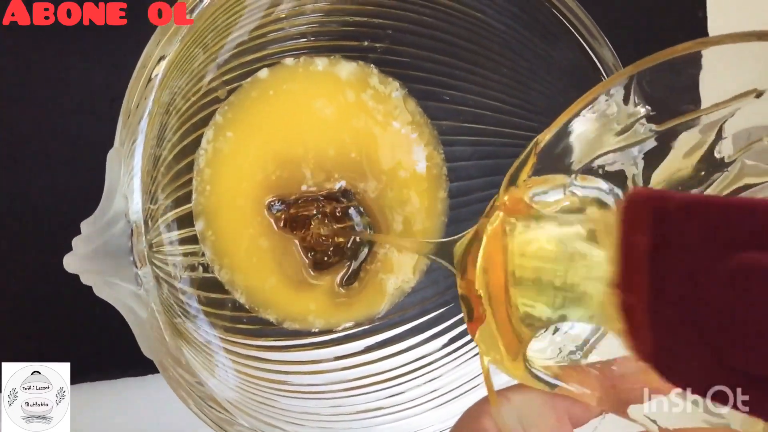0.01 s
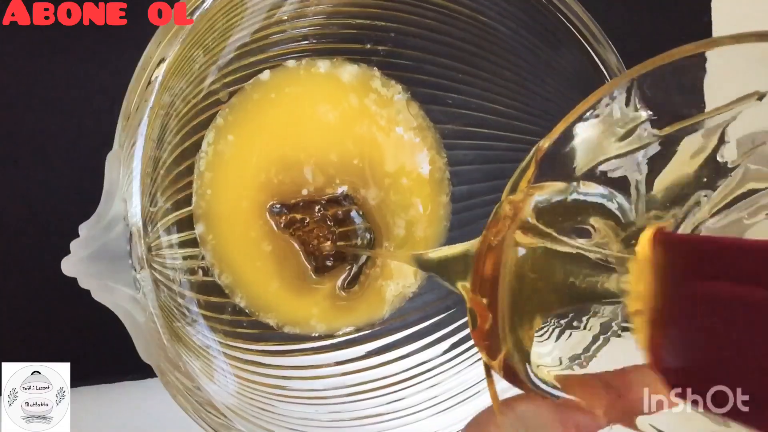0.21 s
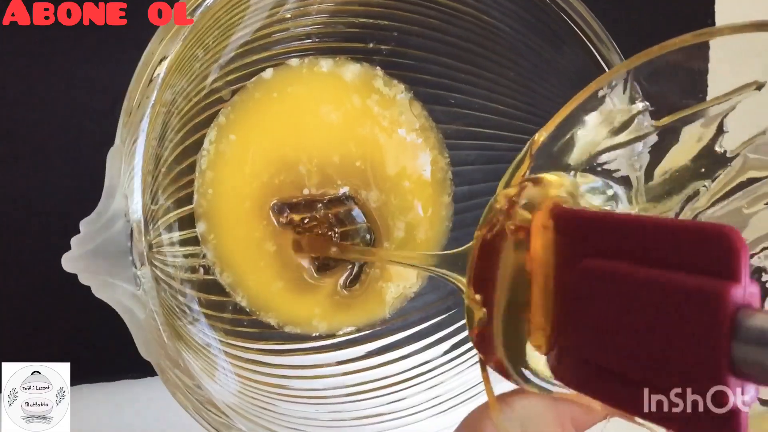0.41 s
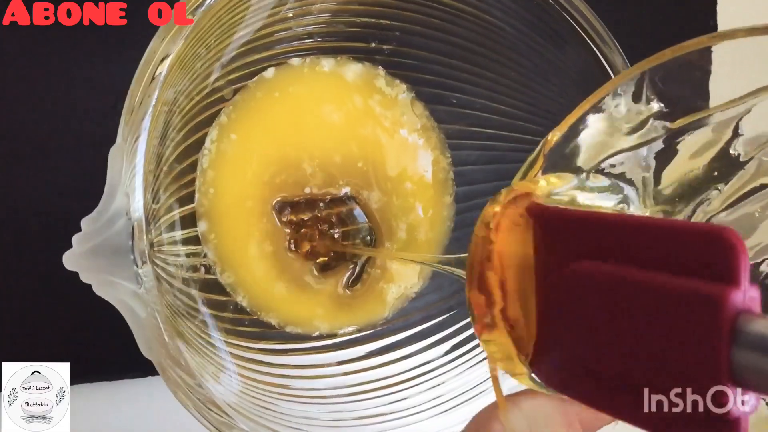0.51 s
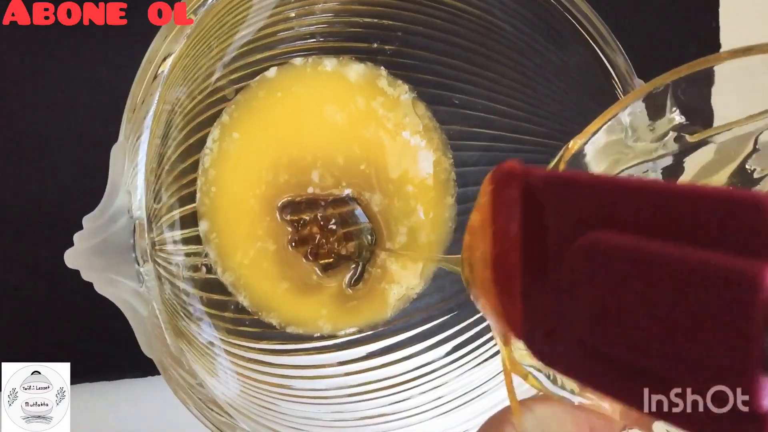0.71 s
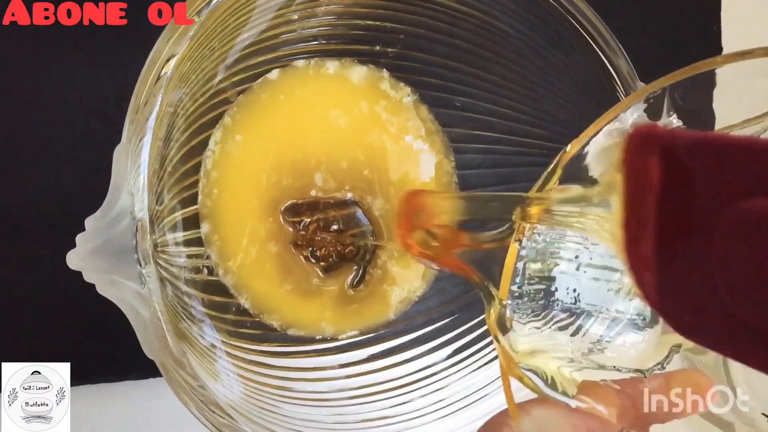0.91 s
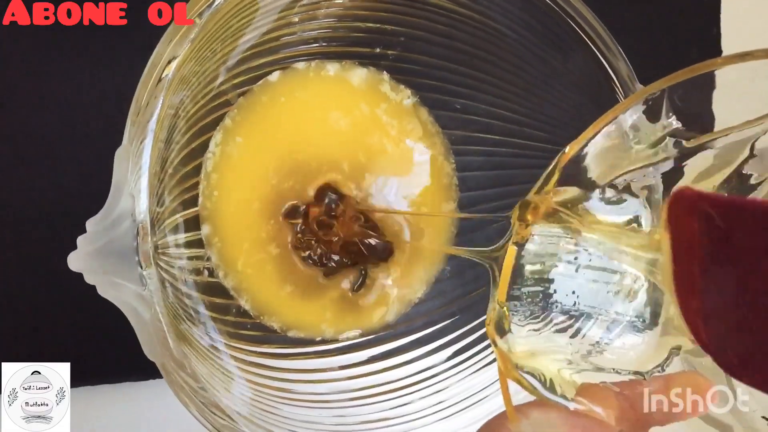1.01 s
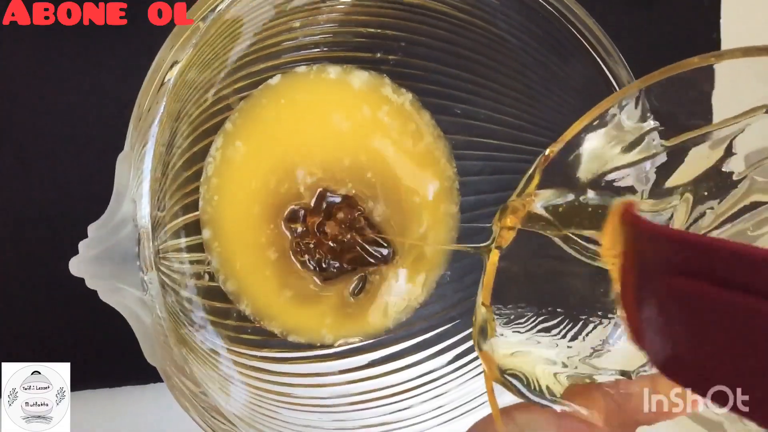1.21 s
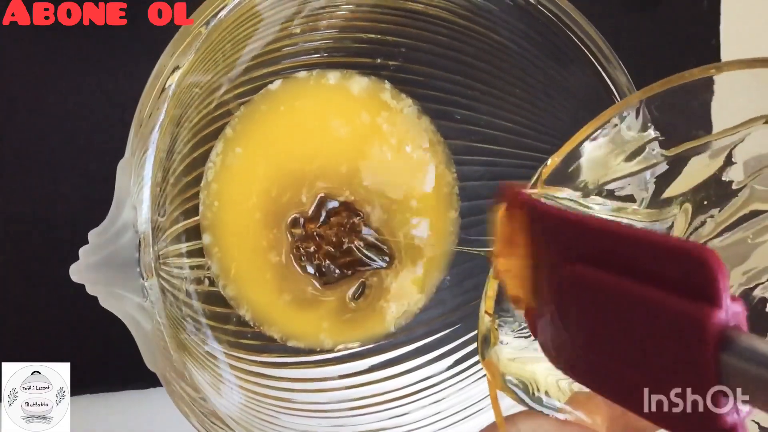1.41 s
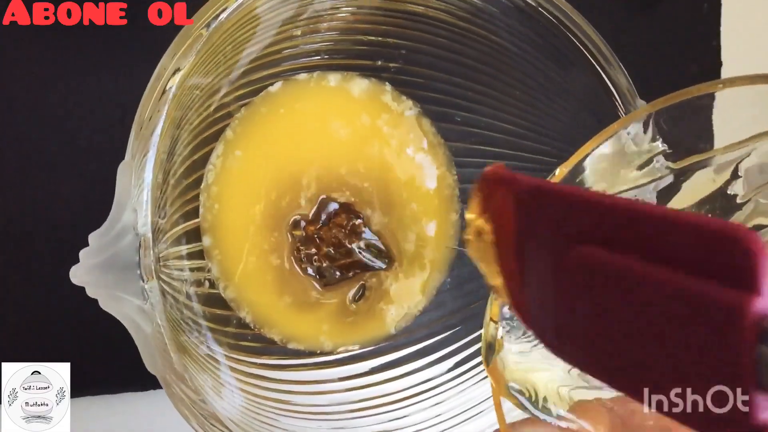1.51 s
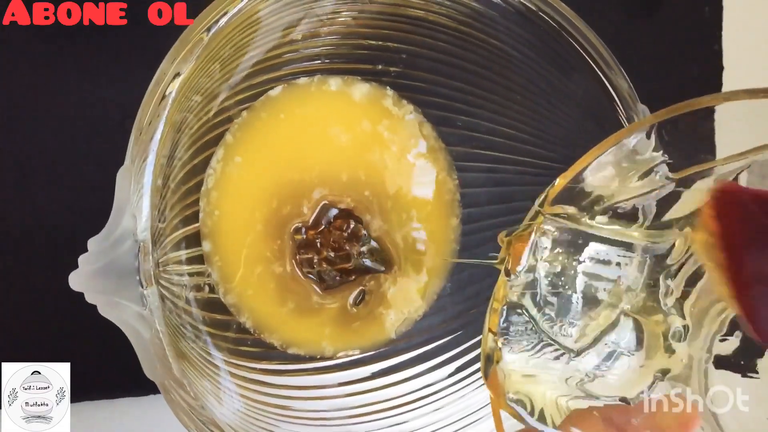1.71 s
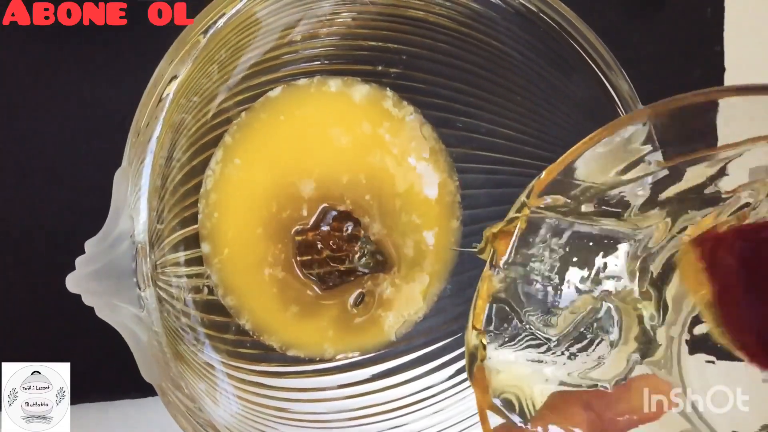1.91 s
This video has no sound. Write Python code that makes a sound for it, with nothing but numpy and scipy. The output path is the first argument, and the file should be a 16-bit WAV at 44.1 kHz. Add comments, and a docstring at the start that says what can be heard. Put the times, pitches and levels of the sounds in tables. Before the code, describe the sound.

A small glass bowl knocks once against a larger one with a sharp, quickly damped clink. A faint dull bump follows, then a sticky spatula snap and a few tiny syrup ticks, close by in a quiet kitchen.

```python
"""A small hand-held glass bowl knocks once against a larger one in a quiet kitchen.
The impact excites the modes of both bowls, and the hand damps their ring. A dull bump follows farther
off, then a sticky snap of the spatula and faint ticks of syrup, each an impulse with a brief fizz.
Knock and ticks reverberate in the room, over a low throbbing shudder, a hush and a faint hum."""
import sys
import numpy as np
from scipy import signal
from scipy.io import wavfile

SR = 44100
rng = np.random.default_rng(int(sys.argv[2]) if len(sys.argv) > 2 else 0)


def transcribe(u):
    """Save the signal u as a 16-bit wav file named by the first command-line argument.

    u: samples, shape (n,) or (channels, n), limited to [-1, 1]; the rate is SR.
    q: integer samples, one column per channel.
    """
    v = np.clip(np.atleast_2d(u).T, -1, 1)
    q = np.round(v * 32767).astype(np.int16)
    wavfile.write(sys.argv[1], SR, q)


N = 88200
TIME_S = np.arange(N) / SR


# Modes of the two bowls: frequency_hz, level_db, t60_s
BOWL_MODES = [(250, -24.5, 0.022), (334, -27.5, .015), (615, -22, 0.045), (865, -32.5, 0.025),
              (966, -25, .26), (1903, -32, .3), (3210, -34, .3), (3300, -37, .35), (7090, -42, .15),
              (11170, -32, .07), (1021.5, -12, 0.053), (1097, -17.5, 0.043), (1390, -11.5, 0.021),
              (1590, -26.5, 0.075), (1867, -14.5, 0.049), (2440, -20, 0.03), (2688, -15, 0.028),
              (2766, -9, 0.0086), (3196, -15, 0.027), (3526, -13, .013), (4530, -22.5, 0.0093),
              (5380, -21.5, .01), (7290, -20, 0.017), (9330, -25.5, 0.0089), (11660, -20, .007),
              (12495, -13, 0.0086), (14800, -20, 0.0082), (15100, -24, 0.0064)]

def bowl_knock(start_s=.2086, contact_s=.001, low_cut_hz=130):
    """Modal vibration: each mode builds up during contact, then decays, over a broadband crack."""
    sound = burst(start_s, level_db=-18, rise_s=contact_s, t60_s=.022, centre_hz=6000, width_hz=14000)
    for frequency_hz, level_db, t60_s in BOWL_MODES:
        mode = np.sin(2 * np.pi * frequency_hz * (TIME_S - start_s))
        sound += amp(level_db) * mode * swell(start_s, contact_s, t60_s)
    return high_pass(sound, low_cut_hz)


# Spatula snap and syrup ticks: start_s, pop_db, fizz_db, centre_hz, width_hz, t60_s
STICKY_SNAPS = [(.312, -61, -53, 15000, 2500, .006), (1.103, -56, -50.5, 11500, 9000, 0.024),
                (1.0935, -27, -35, 8500, 13600, .007), (1.0949, -23, -31, 8500, 13600, .008),
                (1.2219, -32, -50.5, 13260, 5100, 0.0095), (1.2533, -45.5, -45.5, 13000, 5000, 0.0036),
                (1.2531, -33.5, -67, 13800, 5000, 0.013), (1.287, -45, -62, 13500, 4000, .004),
                (1.5905, -38.5, -55, 13830, 5080, 0.0071), (1.9182, -49, -51.5, 14000, 4900, 0.0033)]

def sticky_snaps(rise_s=.0005):
    """Impulse response: each snap is a band-limited pop with a short fizz in the same band."""
    sound = np.zeros(N)
    for start_s, pop_db, fizz_db, centre_hz, width_hz, t60_s in STICKY_SNAPS:
        impulse = np.full(N, 1e-18)
        impulse[int(start_s * SR)] = amp(pop_db)
        sound += band(impulse, centre_hz - width_hz / 2, centre_hz + width_hz / 2)
        sound += burst(start_s - rise_s, fizz_db, rise_s, t60_s, centre_hz, width_hz)
    return sound


# Noise bands of the bumps: start_s, level_db, rise_s, t60_s, centre_hz, width_hz
BUMP_BANDS = [(0.615, -54.5, 0.019, 0.2, 1880, 644), (0.616, -56.5, .012, 0.28, 960, 527),
              (.622, -65, 0.014, 0.17, 2860, 1980), (.6, -56.5, 0.014, 0.12, 251.7, 150),
              (0.691, -61, 0.0084, 0.4, 525, 196), (.8, -65.5, 0.023, .4, 500, 195),
              (1.092, -58, 0.00081, 0.072, 2350, 394), (1.069, -62, 0.017, 0.22, 2340, 4000),
              (1.092, -50.5, 0.0044, 0.23, 219, 156), (1.092, -54, 0.0027, 0.091, 700, 148),
              (1.092, -60, 0.0016, 0.08, 1364, 198)]

def dull_bumps():
    """Transient noise: decaying bands add up to the far bump and a soft thud under the snap."""
    return sum(burst(*row) for row in BUMP_BANDS)


# Hollow tones of the far bump: start_s, level_db, rise_s, t60_s, pitch_hz
BUMP_TONES = [(.618, -46, .018, .13, 395), (.762, -53, .018, .15, 215), (.765, -57, .015, .2, 465),
              (.78, -59, .03, .5, 300), (.835, -56, .035, .15, 480)]

def hollow_tones():
    """Damped oscillation: each sine swells and dies away, wavering slightly in phase."""
    sound = np.zeros(N)
    for start_s, level_db, rise_s, t60_s, pitch_hz in BUMP_TONES:
        phase = 2 * np.pi * pitch_hz * TIME_S + .53 * drift(32)
        sound += amp(level_db) * np.sin(phase) * swell(start_s, rise_s, t60_s)
    return sound


# Decay of the kitchen's reflections: frequency_hz, t60_s, level_db
ROOM_DECAY = [(150, 0.67, -14), (400, 0.43, -14), (990, 0.39, -18.5), (2000, 0.38, -18.5),
              (3300, 0.32, -19), (6000, 0.29, -14), (9000, .22, -15), (12000, .19, -16),
              (15000, .18, -17.5)]

def kitchen_reverb(source, delay_s=.004, rise_s=.002):
    """Reverberation: dense reflections act as noise that decays at its own rate in each half octave."""
    frequency_hz, *columns = np.transpose(ROOM_DECAY)
    edges_hz = 100 * 2 ** np.arange(0, 7.6, .5)
    tail = np.zeros(N)
    for low_hz, high_hz in zip(edges_hz, edges_hz[1:]):
        t60_s, level_db = [at_band_centre(low_hz, high_hz, frequency_hz, c) for c in columns]
        reflections = band(rng.standard_normal(N), low_hz, high_hz)
        tail += amp(level_db) * reflections * swell(delay_s, rise_s, t60_s)
    impulse_response = tail[:SR // 2] / np.sqrt(SR / 100)
    return signal.fftconvolve(source, impulse_response)[:N]


# Course of the low shudder: time_s, pitch_hz, level_db, octave_db
SHUDDER_COURSE = [(0.0, 63.3, -59.5, -58.5), (0.1, 61.5, -66, -80), (0.17, 65.4, -60, -82),
                  (0.21, 64.7, -88, -46), (0.24, 63, -82.5, -86), (0.27, 62.6, -64, -54.5),
                  (0.31, 64.7, -80, -84), (0.34, 61.3, -64.5, -87), (0.44, 60.6, -52, -66),
                  (0.48, 61.5, -68.5, -67.5), (0.53, 60.2, -53.5, -70), (0.59, 61.4, -76.5, -73.5),
                  (0.9, 59.7, -78, -68.5), (0.98, 57.8, -51, -71.5), (1.04, 61.7, -58.5, -87.5),
                  (1.09, 60.86, -67.5, -77.5), (1.12, 63.3, -47.5, -46), (1.19, 59.85, -52, -55.5),
                  (1.24, 59.0, -54.5, -57), (1.27, 56.3, -80, -68), (1.32, 59.8, -58.5, -85.5),
                  (1.36, 57.3, -74, -92), (1.42, 58.2, -49.5, -84), (1.47, 56, -73, -74.5),
                  (1.52, 55.2, -64.5, -76.5), (1.56, 54.5, -71.5, -65.5), (1.59, 54.8, -74, -79),
                  (1.65, 63.9, -67, -86), (1.68, 62.9, -89, -73.5), (1.72, 62.63, -45, -55),
                  (1.75, 61.6, -47, -62.5), (1.8, 65.06, -59.5, -65), (1.85, 64.6, -54, -66),
                  (2.0, 64.3, -70, -73.5)]

def shudder():
    """Amplitude and frequency modulation: a low tone and its octave throb and waver."""
    time_s, *columns = np.transpose(SHUDDER_COURSE)
    pitch_hz, level_db, octave_db = [np.interp(TIME_S, time_s, c) for c in columns]
    phase = 2 * np.pi * np.cumsum(pitch_hz) / SR
    fundamental = amp(level_db) * np.sin(phase)
    octave = amp(octave_db + .56 * drift(15)) * np.cos(2 * phase + 1.2 * drift(8))
    return np.sqrt(2) * (fundamental + octave)


# Spectrum of the room's hush: frequency_hz, relative_level_db
HUSH_SPECTRUM = [(88, -35), (150, -7), (172, -7), (218, -1), (323, -14.5), (479, -9.5), (752, -19),
                 (830, -14.5), (1470, -21), (4970, -29), (14100, -36), (16500, -46.5)]

def room_hush(level_db=-65, flicker_db=.5):
    """Spectral shaping: third-octave bands of noise, each flickering a little about its own level."""
    edges_hz = 130 * 2 ** np.arange(0, 7.2, 1 / 3)
    white = rng.standard_normal((2, N))  # neighbouring bands use independent noise
    sound = np.zeros(N)
    for k, (low_hz, high_hz) in enumerate(zip(edges_hz, edges_hz[1:])):
        band_db = at_band_centre(low_hz, high_hz, *np.transpose(HUSH_SPECTRUM))
        sound += amp(band_db + flicker_db * drift(2.7)) * band(white[k % 2], low_hz, high_hz)
    return amp(level_db) * rms_one(sound)


# Partials of the room's hum: pitch_hz, level_db
HUM_PARTIALS = [(147, -73.5), (205, -70), (300, -70.5), (738, -77)]

def room_hum():
    """Random modulation: faint sustained sines drift in level and phase."""
    return sum(amp(level_db + drift(1.7)) * np.sin(2 * np.pi * pitch_hz * TIME_S + 1.5 * drift(3))
               for pitch_hz, level_db in HUM_PARTIALS)


def rumble(level_db=-68.5, low_hz=45, high_hz=102):
    """Stationary noise: a steady band of deep bass."""
    return amp(level_db) * rms_one(band(rng.standard_normal(N), low_hz, high_hz))


def burst(start_s, level_db, rise_s, t60_s, centre_hz, width_hz):
    """Enveloped noise: a band with a geometric centre of centre_hz swells and decays."""
    low_hz = np.sqrt(centre_hz ** 2 + width_hz ** 2 / 4) - width_hz / 2
    noise = rms_one(band(rng.standard_normal(N), low_hz, low_hz + width_hz))
    return amp(level_db) * noise * swell(start_s, rise_s, t60_s)


def swell(start_s, rise_s, t60_s):
    """Exponential decay: after a quadratic rise, the envelope falls 60 dB in t60_s."""
    age_s = np.maximum(TIME_S - start_s, 0)
    attack = np.minimum(age_s / rise_s, 1) ** 2
    return attack * amp(-60 * np.maximum(age_s - rise_s, 0) / t60_s)


def drift(rate_hz, hop=40, settle=2000):
    """Low-pass noise: a slow random fluctuation of unit rms."""
    pole = np.exp(-2 * np.pi * rate_hz * hop / SR)
    white = rng.standard_normal(N // hop + settle + 2)
    slow = signal.lfilter([1], [1, -2 * pole, pole * pole], white)[settle:]
    return np.interp(np.arange(N) / hop, np.arange(len(slow)), rms_one(slow))


def at_band_centre(low_hz, high_hz, frequency_hz, values):
    """Log-frequency interpolation: a curve's value at the geometric centre of a band."""
    return np.interp(np.log(low_hz * high_hz) / 2, np.log(frequency_hz), values)


def band(x, low_hz, high_hz):
    """Band-pass filtering with a maximally flat passband."""
    edges_hz = np.clip([low_hz, high_hz], 15, .46 * SR)
    return signal.sosfilt(signal.butter(2, edges_hz, "band", fs=SR, output="sos"), x)


def high_pass(x, cutoff_hz):
    """High-pass filtering: the bass falls 12 dB per octave below the cutoff."""
    return signal.sosfilt(signal.butter(2, cutoff_hz, "high", fs=SR, output="sos"), x)


def amp(level_db):
    """Decibels as an amplitude ratio."""
    return 10 ** (np.asarray(level_db) / 20)


def rms_one(x):
    """Normalisation to unit rms."""
    return x / np.sqrt(np.mean(x ** 2) + 1e-20)


def scene(snap_reverb_db=-5.5):
    """Superposition: direct sounds, their reverberation and the background add in one channel."""
    knock, snaps = bowl_knock(), sticky_snaps()
    background = rumble()
    reverb = kitchen_reverb(knock + amp(snap_reverb_db) * snaps)
    bumps = dull_bumps() + hollow_tones()
    background += shudder() + room_hush() + room_hum()
    return (knock + snaps + bumps + reverb + background)[None]


def record(dry, low_cut_hz=40, peak_limit=.9, stopband_hz=17050):
    """Band limiting: deep bass and the top are filtered away, and the knock's peak is limited."""
    clipped = np.clip(high_pass(dry, low_cut_hz), -peak_limit, peak_limit)
    return signal.sosfilt(signal.cheby2(20, 60, stopband_hz, fs=SR, output="sos"), clipped)


dry = scene()
out = record(dry)
transcribe(out)
```